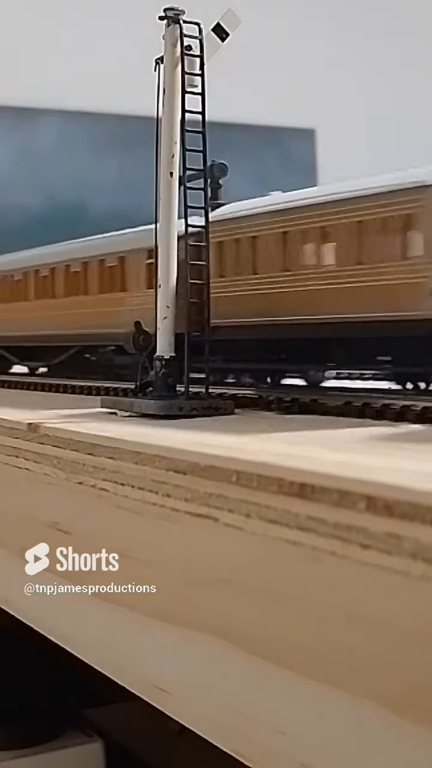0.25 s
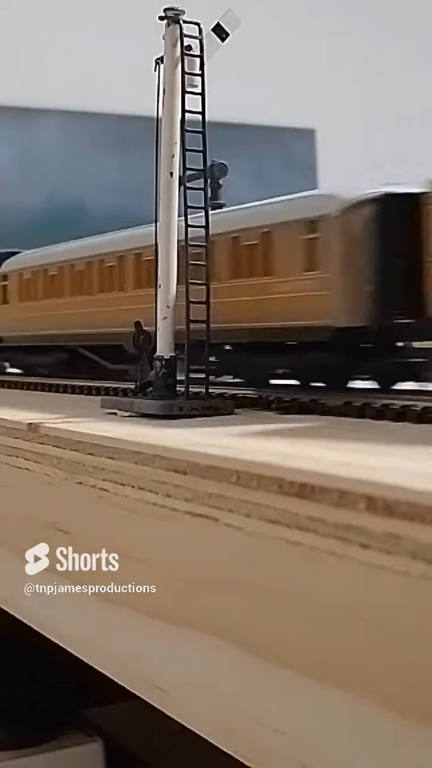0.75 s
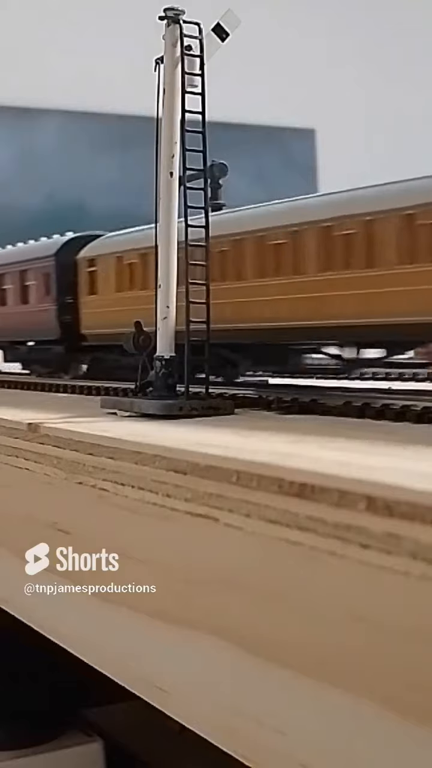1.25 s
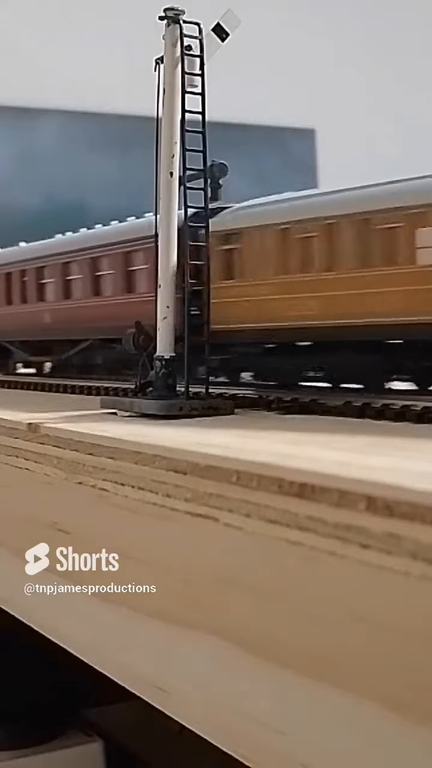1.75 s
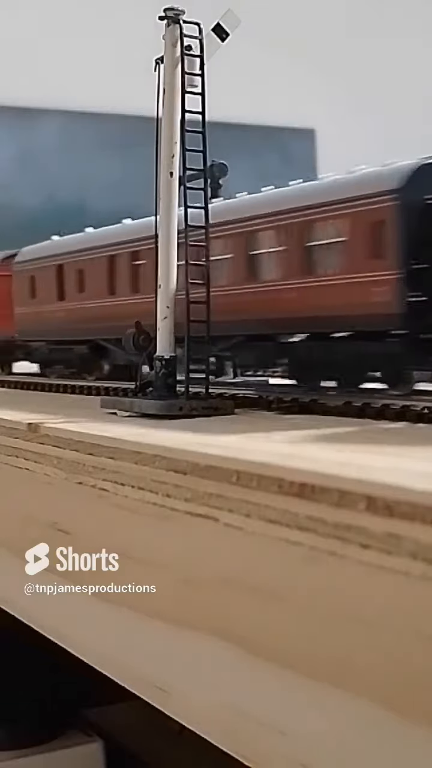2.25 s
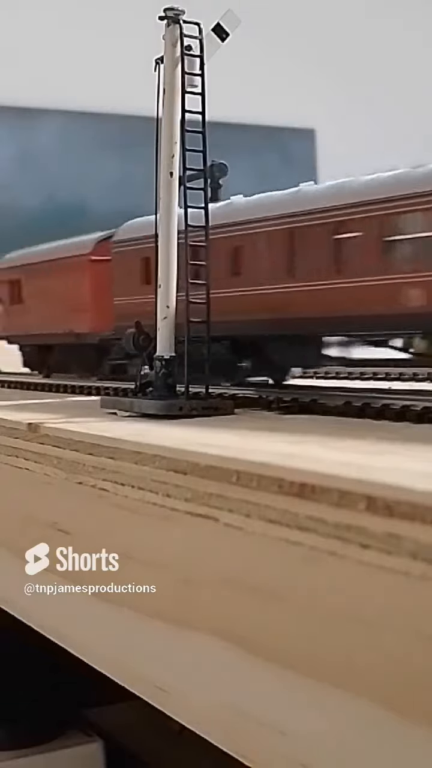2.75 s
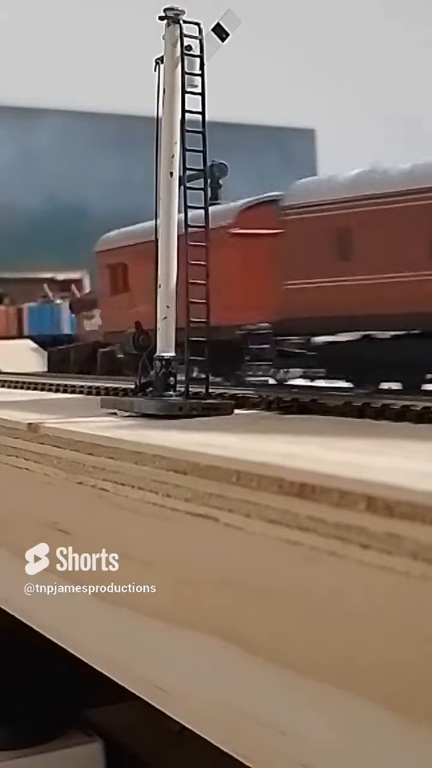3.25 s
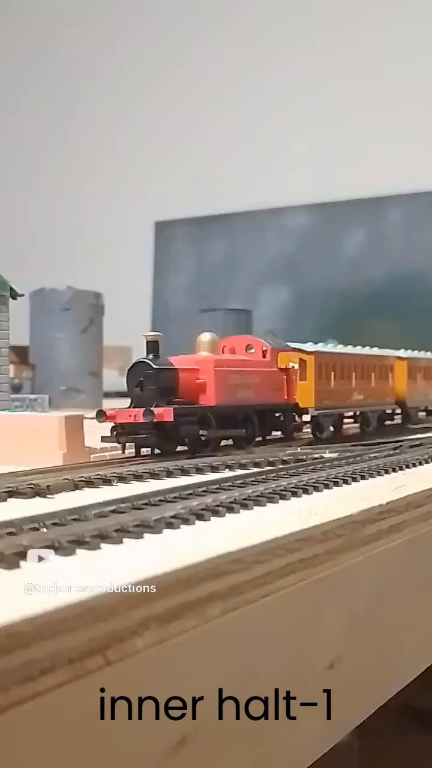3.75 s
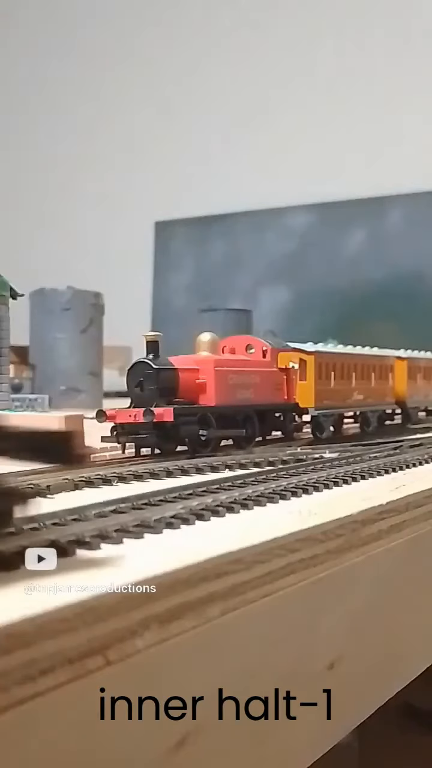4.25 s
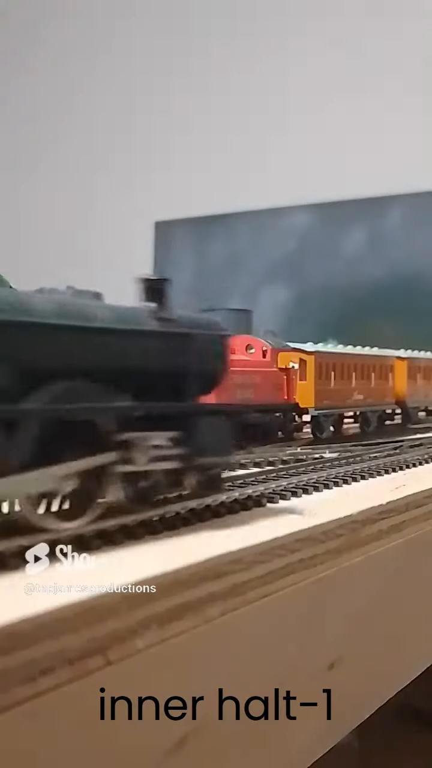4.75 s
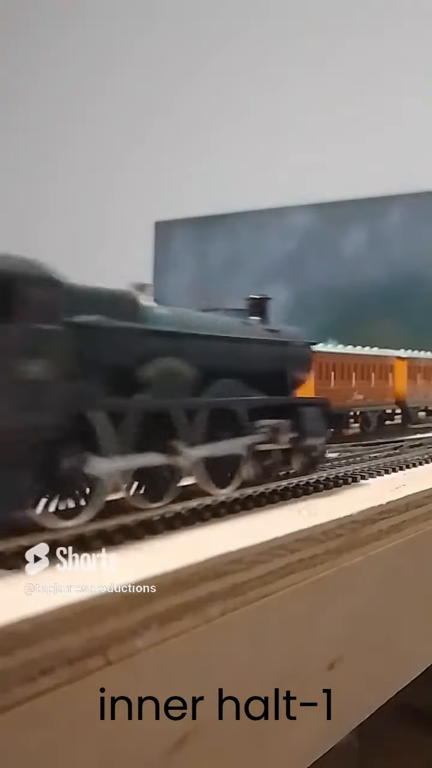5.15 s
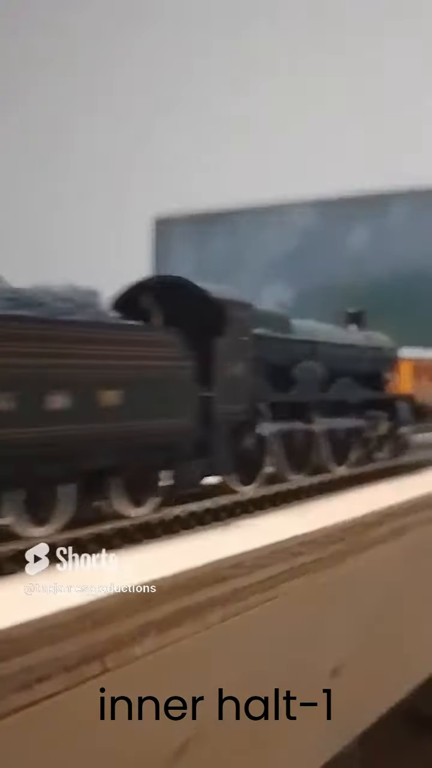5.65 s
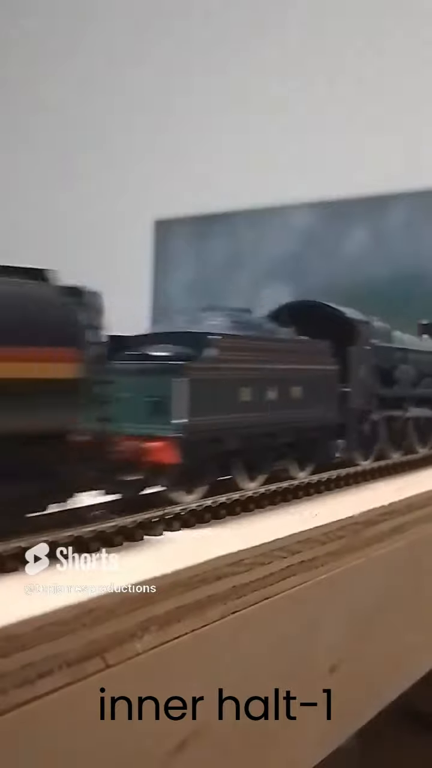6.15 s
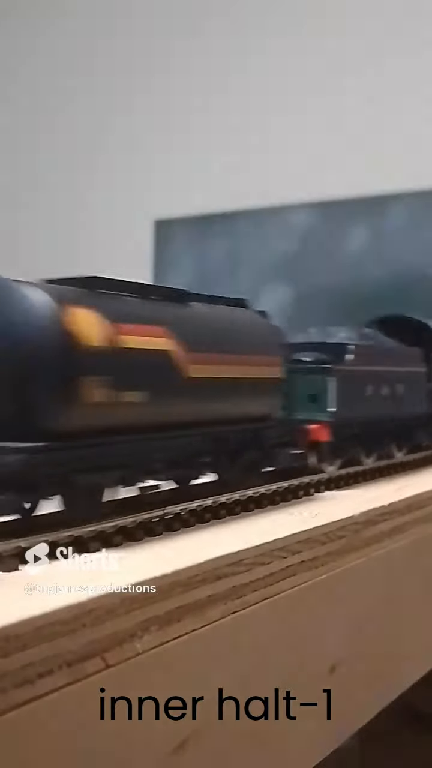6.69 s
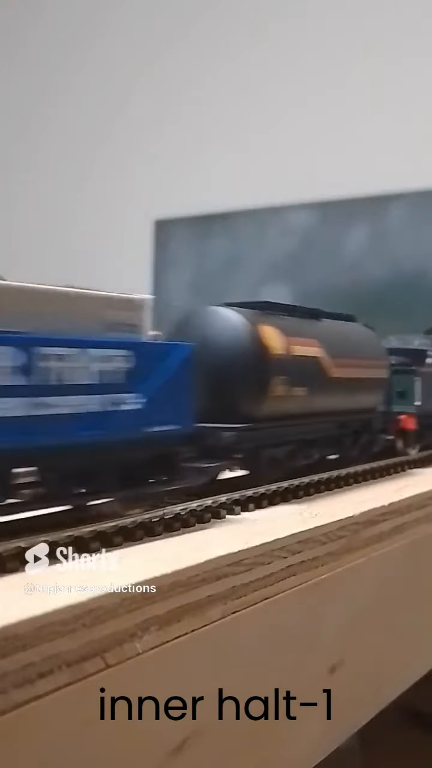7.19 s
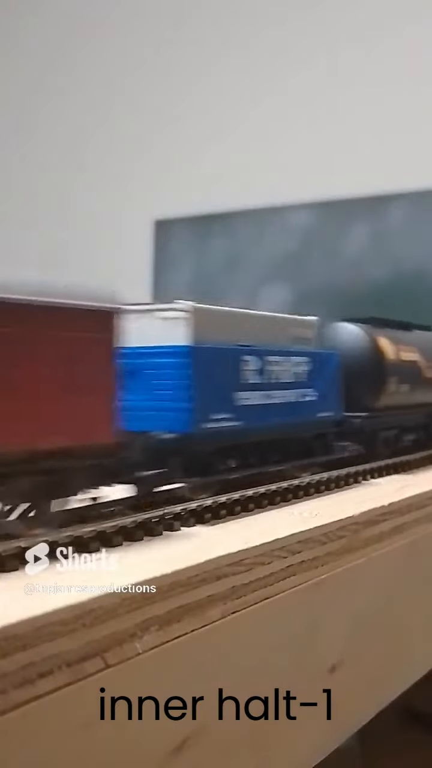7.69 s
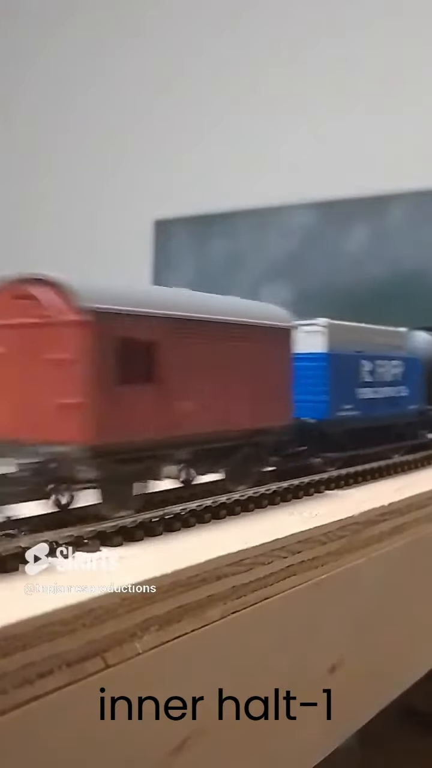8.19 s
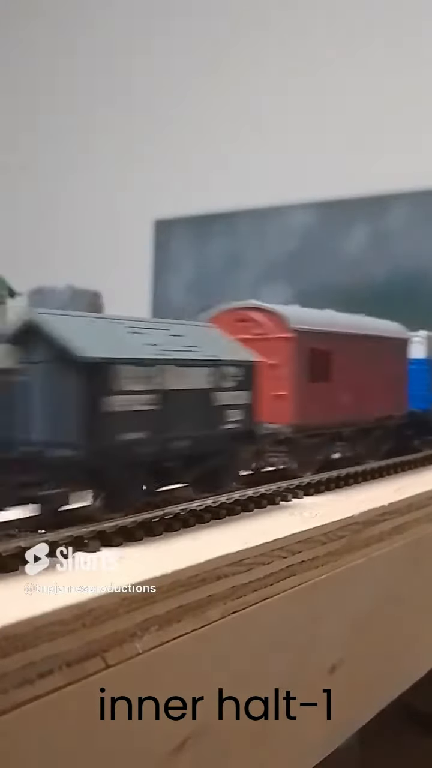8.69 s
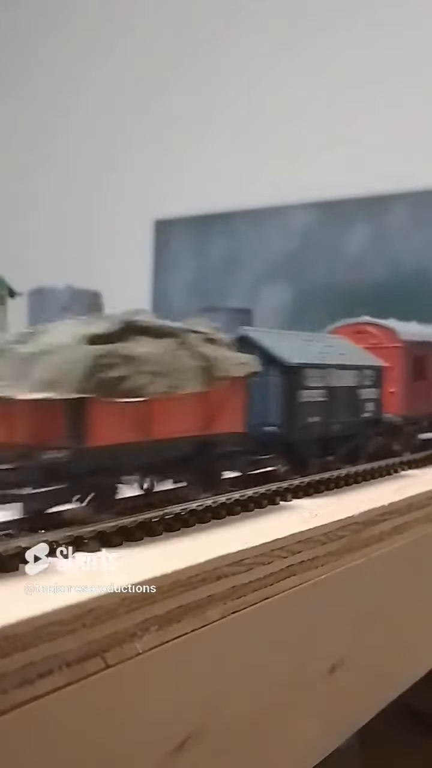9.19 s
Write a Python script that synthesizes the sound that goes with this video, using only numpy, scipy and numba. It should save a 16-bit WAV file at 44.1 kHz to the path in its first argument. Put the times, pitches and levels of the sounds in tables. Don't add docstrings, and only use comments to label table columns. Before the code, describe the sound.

Constant bright hissing stops dead; after a tiny gap, a small train roars by with fast throbbing chuffs, wheel rumble and one sharp steam spurt.

```python
import sys
import numpy as np
from scipy import signal
from scipy.fft import rfft, irfft
from scipy.io import wavfile
from scipy.ndimage import uniform_filter1d
from numba import njit

SR = 44100
rng = np.random.default_rng(int(sys.argv[2]) if len(sys.argv) > 2 else 0)


def materialize(psi):
    bounded = np.clip(np.atleast_2d(psi).T, -1, 1)
    quanta = np.round(bounded * 32767).astype(np.int16)
    wavfile.write(sys.argv[1], SR, quanta)


def level_to_linear(level):
    exponent = np.asarray(level, float) / 20
    return 10 ** exponent


N = 415863
TIME = np.arange(N) / SR
JET_END_S, TRAIN_START_S = 3.4975, 3.6245
DRAWS_AWAY_S = 5.17
LAG_SCATTER_S = 0.00588
SPLIT_S = 0.04


def unit(x):
    return x / np.sqrt(np.mean(x ** 2))


def curves(table):
    s, *columns = np.transpose(table)
    return [np.interp(TIME, s, column) for column in columns]


def noise(colour, low_hz=0.91, high_hz=SR):
    hz = np.maximum(np.fft.rfftfreq(N, 1 / SR), 1)
    colour_hz, colour_db = np.transpose(colour)
    db = np.interp(np.log(hz), np.log(colour_hz), colour_db)
    edges = 1 / np.sqrt((1 + (low_hz / hz) ** 8) * (1 + (hz / high_hz) ** 8))
    return unit(irfft(rfft(rng.standard_normal(N)) * level_to_linear(db) * edges, N))


def walk(rate_hz):
    hold = int(SR / rate_hz)
    held = np.repeat(rng.standard_normal(N // 200), hold)[:N]
    return unit(uniform_filter1d(uniform_filter1d(held, hold), hold))


@njit
def svf(x, hz, width_hz):
    y, band, low = np.empty(len(x)), 0., 0.
    for i in range(len(x)):
        g, damping = np.tan(np.pi * hz[i] / SR), width_hz / hz[i]
        v = (band + g * (x[i] - low)) / (1 + g * (g + damping))
        band, low, y[i] = 2 * v - band, low + 2 * g * v, damping * v
    return y


def ring(hz, width_hz):
    hz = hz + np.zeros(N)
    once = svf(rng.standard_normal(N), hz, 1. * width_hz)
    return unit(svf(once, hz, 1. * width_hz))


def jet():
    # time in seconds, level in dB, whistle above it in dB, nozzle centre in Hz.
    jet_course = [(0.0, -26.5, 3.5, 8400), (0.4, -27, -5, 8650), (0.8, -26.5, -2.5, 8600),
                  (1.3, -26, 0, 8450), (1.9, -26, -3.5, 8300), (2.3, -26.5, -0.5, 8200),
                  (2.7, -26, 1, 8700), (3.1, -27, 1, 8530), (3.5, -26.3, -3, 8600)]
    # frequency in Hz, density in dB per Hz.
    jet_colour = [(15, -46), (25, -19), (75, -20.5), (183, -12.5), (209, -17), (233, -17.5), (398, -16),
                  (845, -7), (2170, -9.5), (3420, -8.5), (4240, -10), (6690, -10.5), (8530, -5.5),
                  (10000, -12.5), (15400, -13.5)]
    # centre in Hz, width in Hz, level in dB.
    jet_rings = [(240, 18, -25), (310, 25, -27.5), (836, 67, -18.5), (3410, 530, -11.5), (5320, 1600, -6)]
    # centre in Hz, width in Hz, level in dB.
    treble_rings = [(11600, 700, -23), (14100, 800, -23)]
    level_db, whistle_db, whistle_hz = curves(jet_course)
    broad = level_to_linear(3.5 + 0.5 * walk(15)) * noise(jet_colour, high_hz=20000.)
    whistle = level_to_linear(whistle_db - 2.5 + 1.4 * walk(31)) * ring(whistle_hz, 1900)
    hollows = np.zeros(N)
    for hz, width_hz, db in jet_rings + treble_rings:
        flutter_db = 1.3 * walk(9.04)
        hollows += level_to_linear(db + flutter_db) * ring(hz * (1 + 0.01 * walk(3)), width_hz)
    return level_to_linear(level_db) * (broad + whistle + hollows)


def knocks():
    # start in seconds, peak in dB, pitch in Hz, ring t60 in seconds.
    joints = [
        (3.964, -1, 310, 0.06),
        (5.165, -12, 1100, .08),
        (5.575, -9, 1000, .06),
        (6.125, -20, 2620, 0.049),
        (8.706, -13, 940, .06),
        (9.215, -18, 2050, .05),
        (9.25, -17, 745, 0.054),
    ]
    out, t = np.zeros(N + SR), np.arange(SR // 4) / SR
    for (s, db, hz, t60_s), detune in zip(joints, rng.standard_normal((len(joints), 3))):
        modes_hz = hz * np.array([0.8, 1, 1.3]) * (1 + 0.06 * detune)
        modes = np.sin(2 * np.pi * np.outer(modes_hz, t)).sum(axis=0) / 2
        envelope = (1 - np.exp(-t / 0.0015)) * np.exp(-np.log(1000) * t / t60_s)
        start = int(s * SR)
        out[start:start + len(t)] += level_to_linear(db) * modes * envelope
    return out[:N]


def blast():
    # time in seconds, level in dB.
    blast_course = [
        (5.235, -68.5),
        (5.255, -16.5),
        (5.29, -18),
        (5.33, -14.5),
        (5.36, -20),
        (5.39, -27),
        (5.46, -39),
    ]
    # frequency in Hz, density in dB per Hz.
    blast_colour = [(2000, -20), (3000, -1.5), (4800, 4), (6600, -3), (8500, 1), (10300, -7.5), (14200, -5),
                    (15500, -14)]
    sounding = (TIME > blast_course[0][0]) & (TIME < blast_course[-1][0])
    level_db = curves(blast_course)[0] + 0.35 * walk(40)
    burst = sounding * level_to_linear(level_db) * noise(blast_colour, low_hz=2400.)
    leak_from_s, leak_fall_s, leak_db = 5.37, 0.055, -29.5
    after = (TIME - leak_from_s) / leak_fall_s
    leak_envelope = np.exp(-np.where(after > 0, after, 4 * after ** 2))
    return burst + level_to_linear(leak_db) * leak_envelope * ring(13500, 5500)


def strokes():
    # first stroke in seconds, strength of first, second and third stroke in dB.
    turn_rows = [(3.591, 0, 3.8, 2.9), (3.89, 1.6, 2.3, 2), (4.185, 0.3, 1.8, 1.7), (4.482, 1.8, 2.4, 1.8),
                 (4.785, 0.2, 1.4, 1.6), (5.093, 1.7, 3, 1.4), (5.403, -0.4, 0.4, 2.9),
                 (5.713, 0.8, 0.8, 0.9), (6.03, -2.7, 0.62, 2), (6.338, 0.8, 0.6, 0.93),
                 (6.663, -1.5, 1.5, 0.8), (6.968, 0.2, 1.6, 0.5), (7.273, -1.5, 0.8, 1.1),
                 (7.586, -0.7, 1.3, 1.9), (7.888, -1.2, 1, 1.2), (8.205, 1, 1.1, 1.9),
                 (8.512, 0.1, 1.6, 2.3), (8.826, 0.7, 1.3, 1.3), (9.133, 0.3, 1.5, 0.99),
                 (9.43, -0.5, 1, 1)]
    stroke_after_s = [0, .095, .191]
    turns = np.array(turn_rows)
    return (turns[:, :1] + stroke_after_s).ravel(), turns[:, 1:].ravel()


def soft_booms():
    times_s, strengths_db = strokes()
    pitch, level, lag = rng.standard_normal((len(times_s), 3)).T
    boom_s = times_s - 0.00403 + LAG_SCATTER_S * lag
    boom_db = -24 + 1.1 * (strengths_db - 1) + level
    boom_hz = 230.6 * np.exp(0.3 * pitch)
    return list(zip(boom_s, boom_db, boom_hz))


def booms():
    # centre in seconds, level in dB, pitch in Hz.
    strong_booms = [(3.782, -12, 119), (3.971, -10.5, 430), (4.068, -10, 240), (4.174, -14, 320),
                    (4.282, -10.5, 240), (4.402, -8, 240), (4.501, -11, 234), (4.676, -8.5, 190),
                    (4.763, -14, 168), (4.884, -11, 150), (4.987, -12, 174), (5.164, -9, 162),
                    (5.239, -12, 131), (5.41, -11, 180), (5.482, -11.5, 200), (5.927, -15.5, 190),
                    (5.812, -16, 300), (6.024, -11, 247), (6.433, -15, 254), (6.655, -12, 141),
                    (6.731, -15, 240), (6.849, -19, 160), (7.043, -15, 141), (7.77, -18, 330),
                    (8.281, -19, 240)]
    swell_s, sag_per_s = 0.0125, 4.
    out, t = np.zeros(N + SR), np.arange(-2000, 2000) / SR
    rows = strong_booms + soft_booms()
    for (s, db, hz), chance in zip(rows, rng.random((len(rows), 3))):
        sagging = np.sin(2 * np.pi * (hz * t * (1 - sag_per_s * t) + chance[0]))
        second_hz = hz * (0.712 + 0.703 * chance[1])
        steady = np.sin(2 * np.pi * (second_hz * t + chance[2]))
        start = int(s * SR) - len(t) // 2
        envelope = np.exp(-0.5 * (t / swell_s) ** 2)
        out[start:start + len(t)] += level_to_linear(db - 4.0) * (sagging + 0.5 * steady) * envelope
    return out[:N]


def beats():
    beat_s, low_lag_s = 0.088, -0.0017
    share, base_db, scatter_db = np.array([0.83, 1.3, 1.0]), np.array([1.3, 1.74, 2.5]), 0.5
    hiss_growth_db_per_s = 0.63
    swell_db = np.zeros((3, N))
    times_s, strengths_db = strokes()
    for s, db, chance in zip(times_s, strengths_db, rng.standard_normal((len(times_s), 4))):
        span = slice(int((s - beat_s) * SR), int((s + beat_s) * SR))
        lag_s = low_lag_s + LAG_SCATTER_S * chance[3]
        centre_s = s + lag_s * np.array([[1], [1], [0]])
        puff = np.exp(-0.5 * ((TIME[span] - centre_s) / (0.2 * beat_s)) ** 2)
        peak_db = db * share + base_db + scatter_db * chance[:3]
        peak_db[2] += hiss_growth_db_per_s * (s - DRAWS_AWAY_S)
        swell_db[:, span] += peak_db[:, None] * puff
    return swell_db - np.array([[1.0], [2.1], [2.6]])


def train():
    # time in seconds, wheel rolling in dB, exhaust steam in dB.
    passing = [(3.64, -19.5, -25), (3.95, -19, -25), (4.25, -18, -25.5), (4.55, -14.5, -26),
               (4.85, -18.5, -25), (5.1, -14, -26.5), (5.4, -19.5, -25), (5.7, -20, -26.5),
               (5.95, -18.5, -23), (6.25, -22.5, -25.6), (6.55, -20, -24.5), (6.85, -20.5, -26),
               (7.15, -22.5, -26), (7.6, -23, -28), (8.0, -24, -30.5), (8.6, -24.5, -29.5),
               (9.1, -23.5, -27.5), (9.43, -22.5, -29.5)]
    # frequency in Hz, density in dB per Hz.
    train_colour = [(15, -41), (25, -8), (75, -6.5), (140, -1.5), (239, -2.5), (281, -2), (432, -4.5),
                    (565, -9), (719, -8.5), (916, -11.5), (1200, -11.5), (3420, -15.5), (8530, -23),
                    (10300, -33), (15400, -41.5)]
    layer_edges_hz = [500, 2500, 6000, 9600]
    # pitch arriving in Hz, pitch leaving in Hz, width in Hz, level in dB,
    # nearest in seconds, spread in seconds.
    bodies = [(70, 79, 82, -26, 3.87, 0.29), (268.8, 163, 68, -22, 4.62, 0.5),
              (190, 196, 80, -24.5, 5.3, 0.49), (150, 140, 40, -28, 6.93, 0.28),
              (1000, 1000, 470, -21, 5.15, 0.062), (430, 447, 36, -33, 4.3, 0.35),
              (1135, 1170, 190, -26.5, 3.95, 0.33), (1310, 1310, 160, -26, 4.17, 0.25),
              (1910.3, 1950, 730, -32.5, 4.97, 0.41), (13800, 13800, 2600, -42, 4.5, 0.93),
              (776, 767, 120, -28.5, 4.8, 0.73), (1100, 1030, 180, -29.5, 5.3, 0.8),
              (860, 760, 290, -23.5, 5.92, 0.091), (110.6, 113, 61, -24.5, 5.02, 0.29),
              (770, 510, 310, -26.5, 9.37, 0.52), (2016, 1930, 110, -32, 8.75, .2),
              (1960, 1940, 120, -33, 9.3, 0.22)]
    low_db, middle_db, high_db = beats()
    rumble_db, hiss_db = curves(passing)
    roar_db = -21 + 0.56 * (rumble_db + 20) + 2 * np.maximum(TIME - 7.92, 0)
    bright_db = hiss_db - 2.15 - 0.33 * np.maximum(TIME - DRAWS_AWAY_S, 0) ** 2
    air_db = bright_db - 7.5 + 0.45 * (bright_db + 40.0)
    levels_db = [rumble_db - 2.5, roar_db - 0.5, hiss_db, bright_db, air_db]
    throbs_db = [low_db, middle_db, high_db, 0.79 * high_db, 0.83 * high_db]
    edges_hz = [1., *layer_edges_hz, SR]
    shared_db = 0.54 * walk(25)
    out = np.zeros(N)
    for db, throb_db, from_hz, to_hz in zip(levels_db, throbs_db, edges_hz, edges_hz[1:]):
        rattle_db = 0.8 * walk(35)
        out += level_to_linear(db + throb_db + shared_db + rattle_db) * noise(train_colour, from_hz, to_hz)
    dip_hz, dip_width_hz, dip_depth, dip_until_s = 590, 190, 0.88, 4
    dip = dip_depth / (1 + np.exp((TIME - dip_until_s) / 0.34))
    out -= dip * svf(out, dip_hz + np.zeros(N), 1. * dip_width_hz)
    for come_hz, go_hz, width_hz, db, near_s, spread_s in bodies:
        away = (TIME - near_s) / spread_s
        hz = come_hz + (go_hz - come_hz) * (1 + np.tanh(away)) / 2
        throb_db = low_db if come_hz < layer_edges_hz[0] else middle_db
        level = level_to_linear(db + 1.1 * throb_db + 0.7 * walk(17)) * np.exp(-0.5 * away ** 2)
        out += level * ring(hz, max(width_hz, 0.22 * come_hz))
    return out


def thin_spectrum(x, contrast, weakest, top_floor_db):
    top_hz = 15530
    hz, _, bins = signal.stft(x, SR, nperseg=2048)
    hz = hz[:, None]
    size = np.abs(bins) + 1e-9
    share = size / uniform_filter1d(size, size=21, axis=0)
    floor_db = top_floor_db + 8.0 * (hz - top_hz) / 1000
    audible = uniform_filter1d(size, size=9, axis=0) > level_to_linear(floor_db)
    kept = (share > weakest) * audible * (hz < top_hz)
    gain = share ** (contrast * np.minimum(hz / 400, 1)) * kept
    return signal.istft(bins * gain, SR, nperseg=2048)[1][:N]


def scene():
    second = TIME > (JET_END_S + TRAIN_START_S) / 2
    heard = np.where(second, train() + booms() + blast() + knocks(), jet())
    rounded = np.tanh(1.3 * heard) / 1.3
    both = thin_spectrum(rounded, contrast=0.27, weakest=0.45, top_floor_db=-78.)
    cut = np.clip(np.maximum(JET_END_S - TIME, TIME - TRAIN_START_S) / 0.0006, 0, 1)
    return np.array([cut * both] * 2)


def splits():
    rows = []
    for rate_per_s, first_s, last_s in [(7.2, 0, JET_END_S), (2.4, TRAIN_START_S, N / SR)]:
        count = int(rate_per_s * (last_s - first_s))
        for k, (when, where, wide) in enumerate(rng.random((count, 3))):
            s = first_s + SPLIT_S + (k + when) / count * (last_s - first_s - 2 * SPLIT_S)
            low_hz = np.exp(np.interp(where, (0, 1), np.log((4100, 12300))))
            octaves = np.interp(wide, (0, 1), (0.2, 0.45))
            rows.append((s, low_hz, low_hz * 2 ** octaves))
    return rows


def band_limit(x):
    return signal.sosfilt(signal.butter(12, 16090, fs=SR, output="sos"), x)


def record(dry):
    mid, side = dry[0], np.zeros(N)
    size = int(SPLIT_S * SR)
    hz = np.fft.rfftfreq(size, 1 / SR)
    for s, low_hz, high_hz in splits():
        start = int(s * SR) - size // 2
        span = slice(start, start + size)
        heard = np.abs(rfft(mid[span])) * ((hz > low_hz) & (hz < high_hz))
        other = irfft(heard * np.exp(2j * np.pi * rng.random(len(hz))), size)
        side[span] += level_to_linear(-4) * other * signal.windows.tukey(size, 0.7)
    return band_limit(np.array([mid + side, mid - side]))


dry = scene()
out = record(dry)
materialize(out)
```